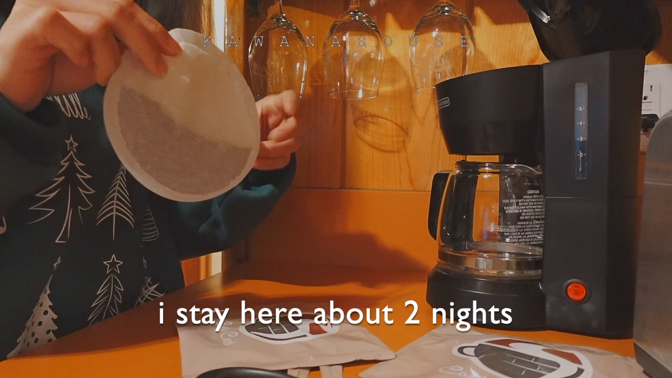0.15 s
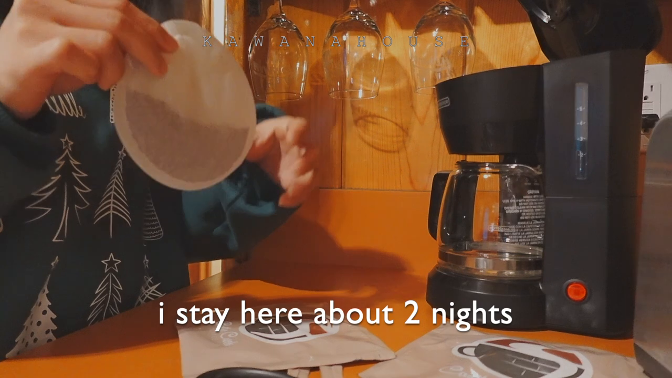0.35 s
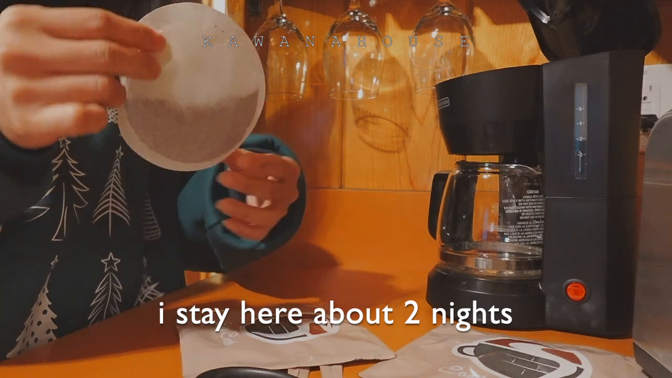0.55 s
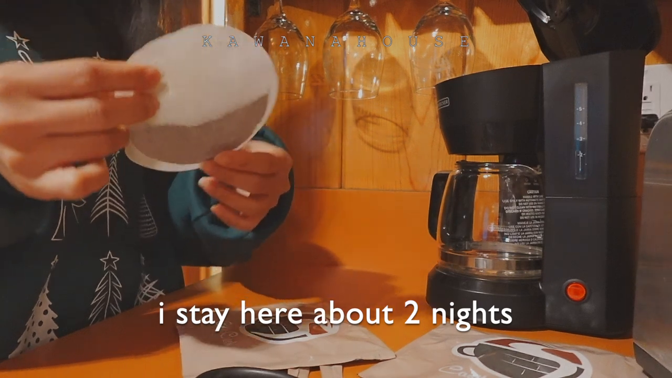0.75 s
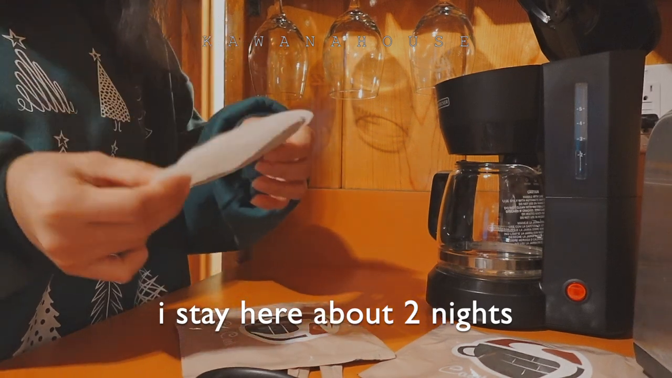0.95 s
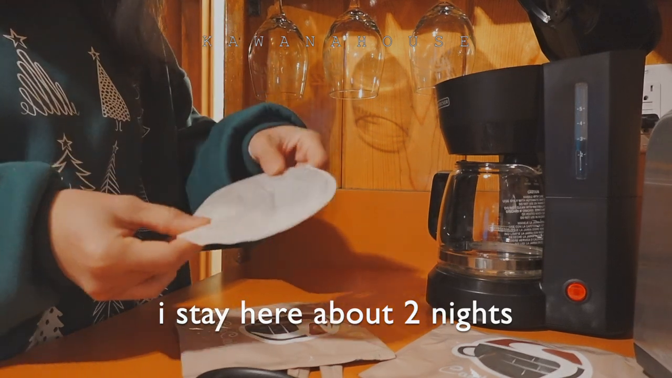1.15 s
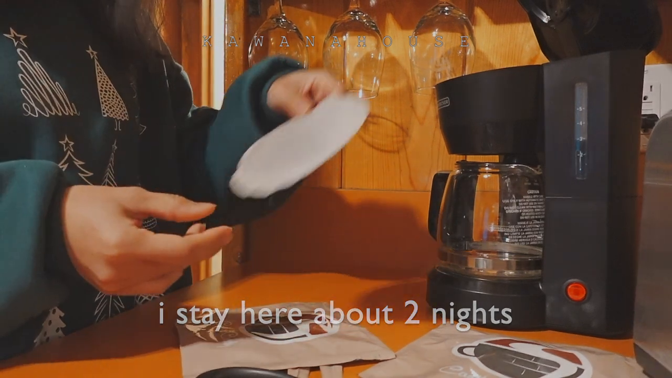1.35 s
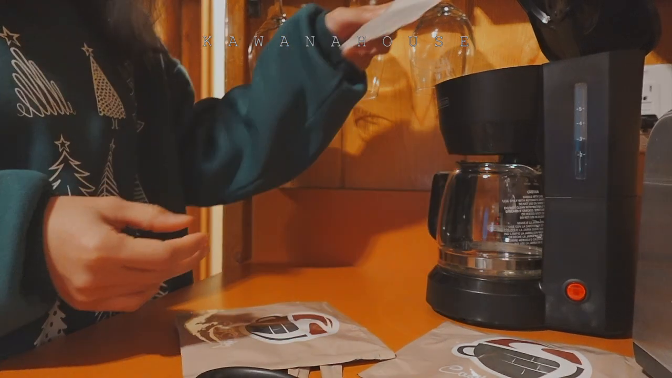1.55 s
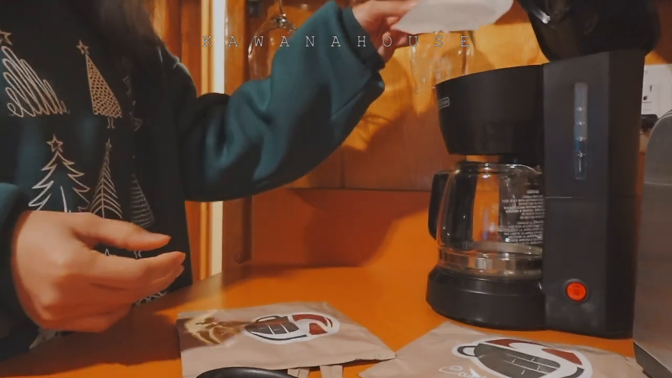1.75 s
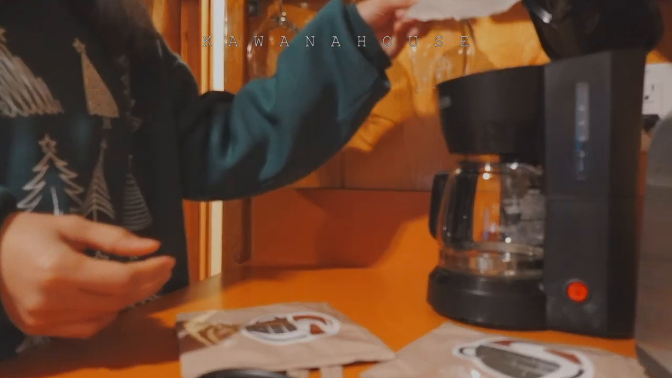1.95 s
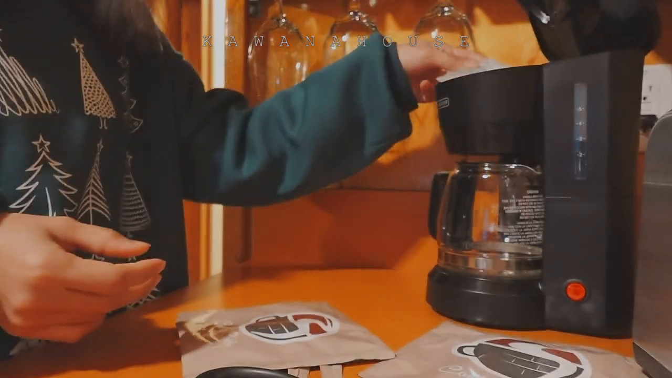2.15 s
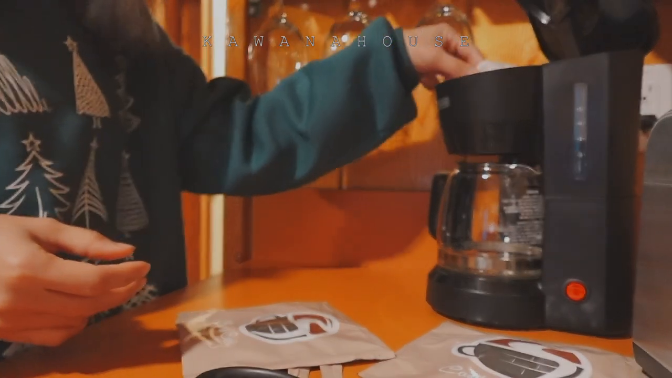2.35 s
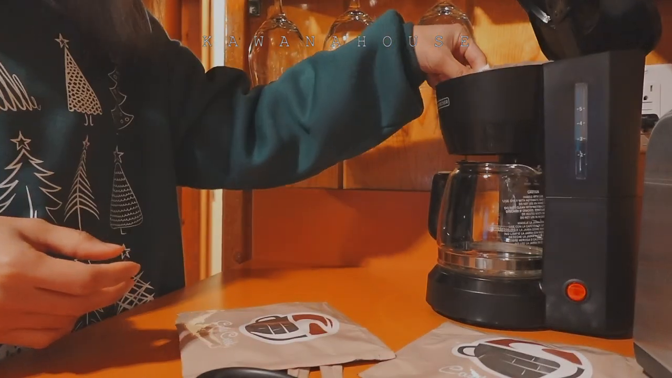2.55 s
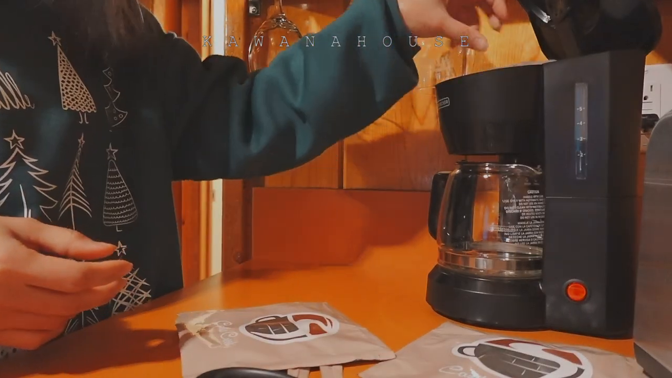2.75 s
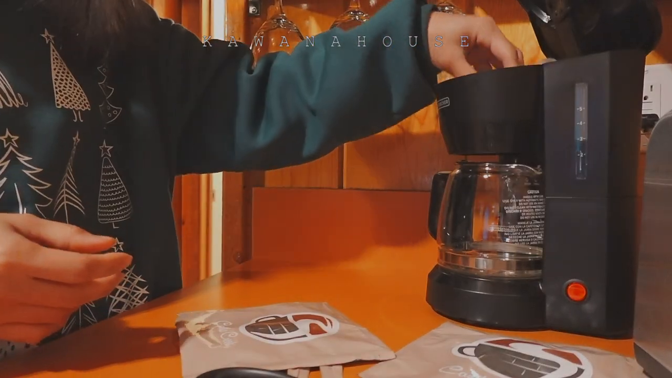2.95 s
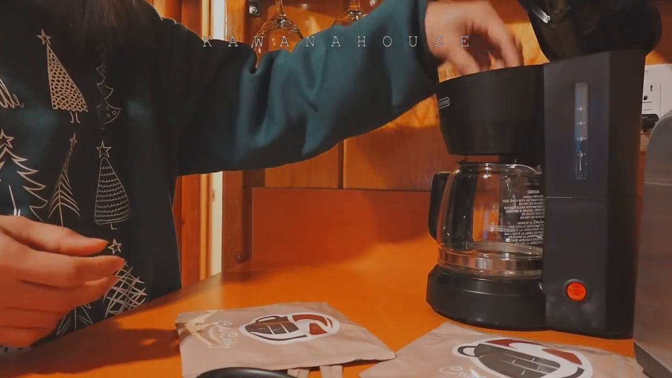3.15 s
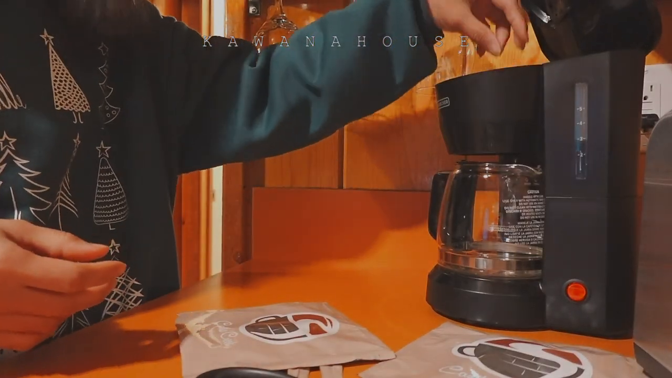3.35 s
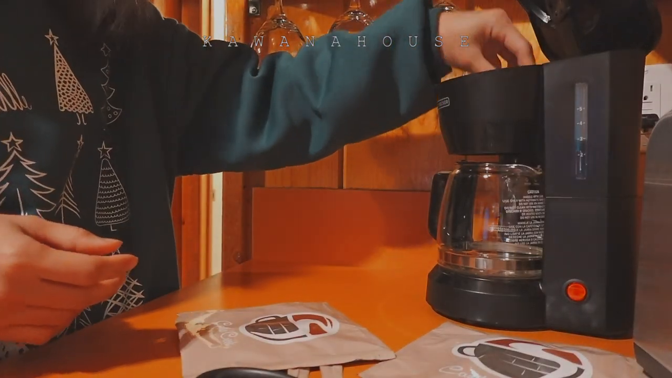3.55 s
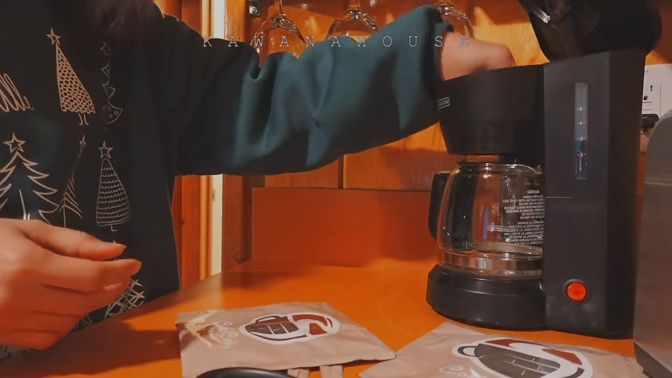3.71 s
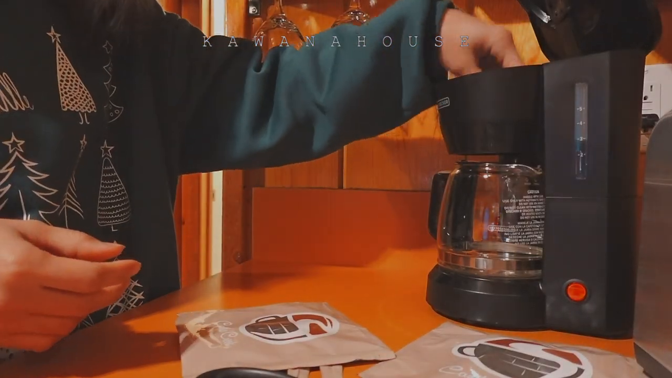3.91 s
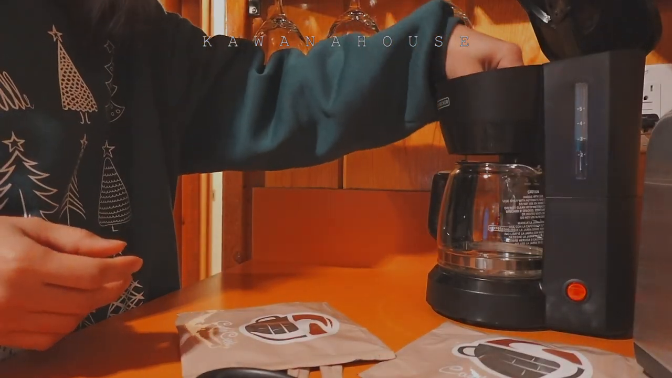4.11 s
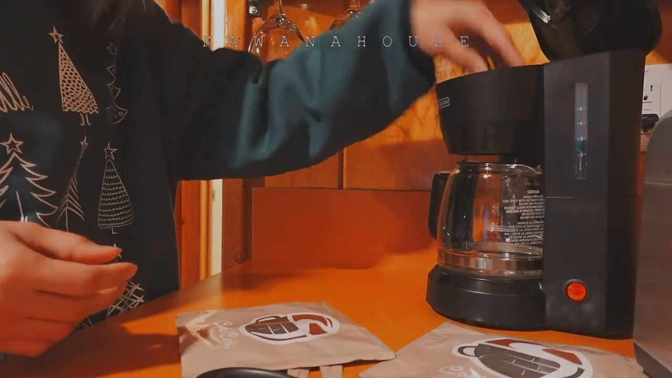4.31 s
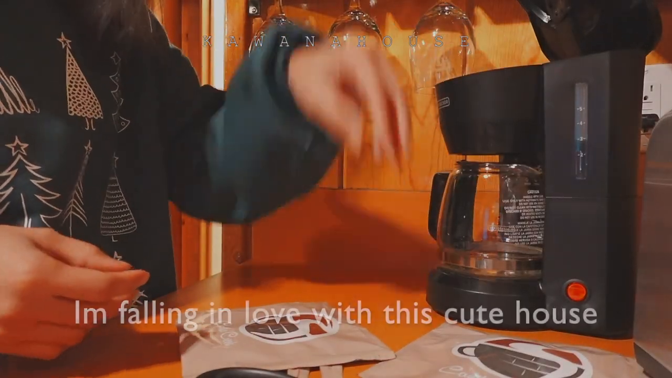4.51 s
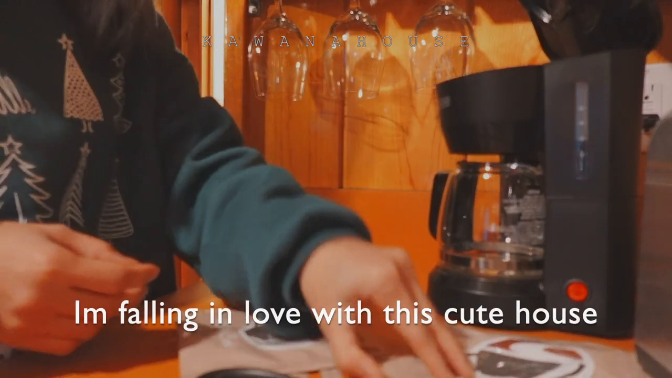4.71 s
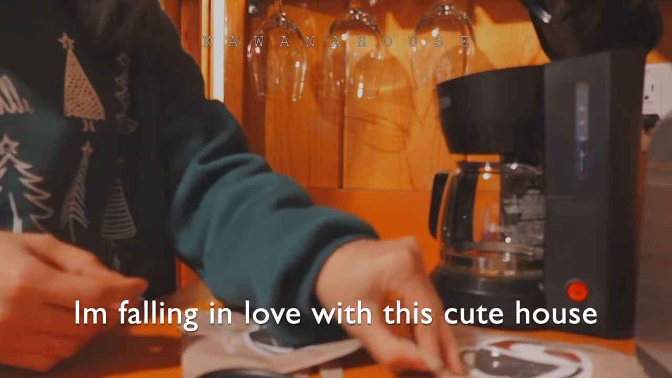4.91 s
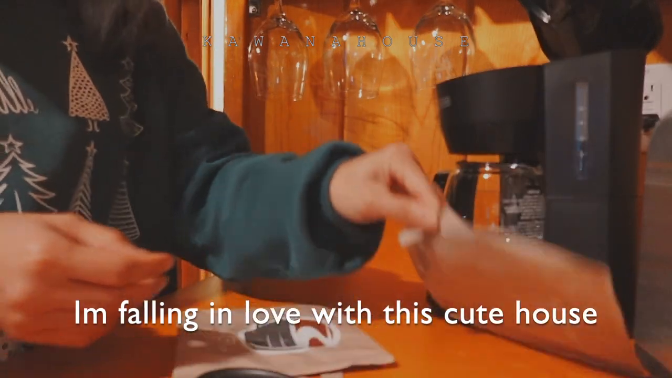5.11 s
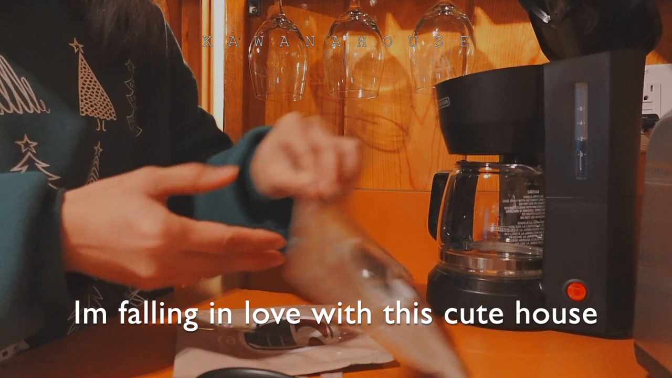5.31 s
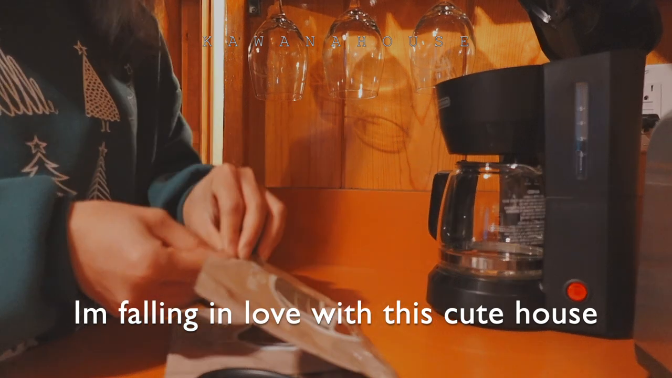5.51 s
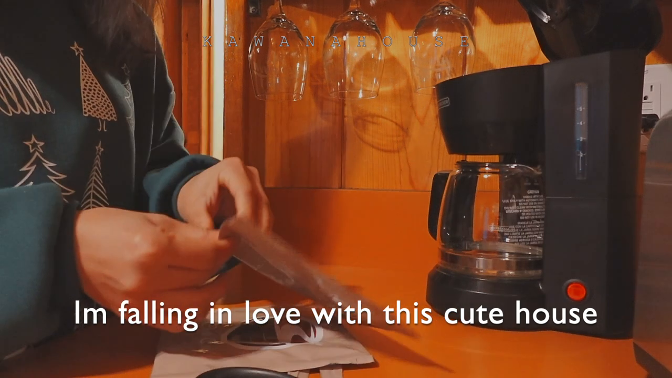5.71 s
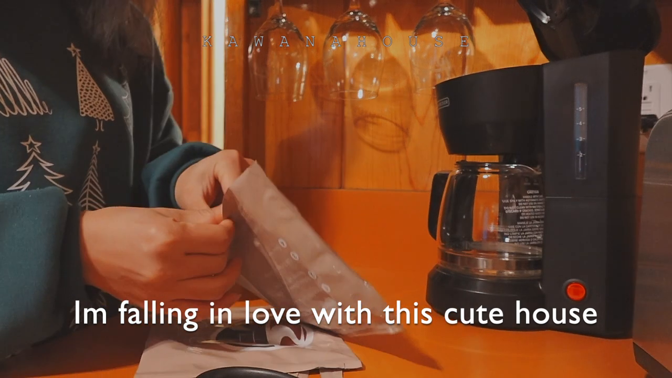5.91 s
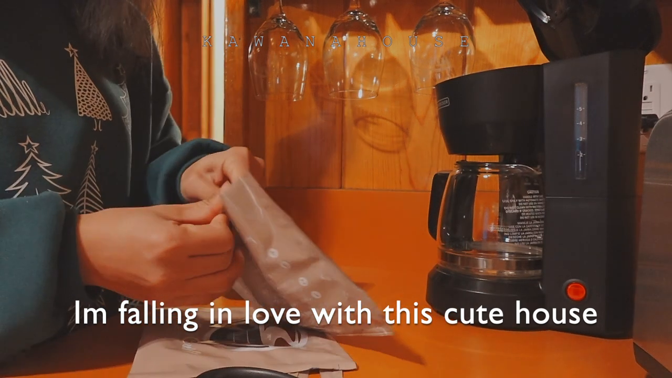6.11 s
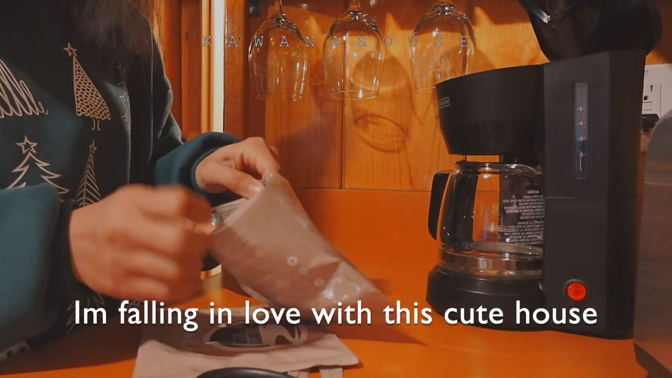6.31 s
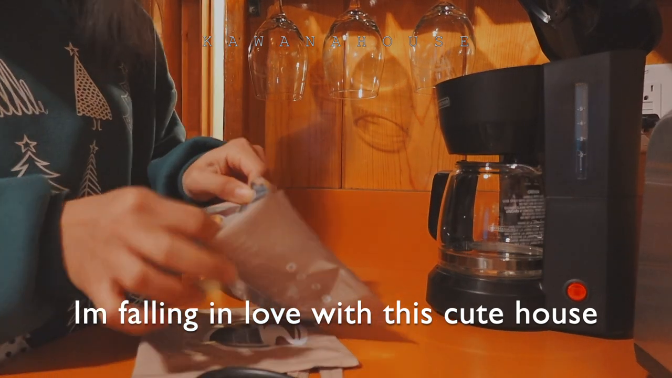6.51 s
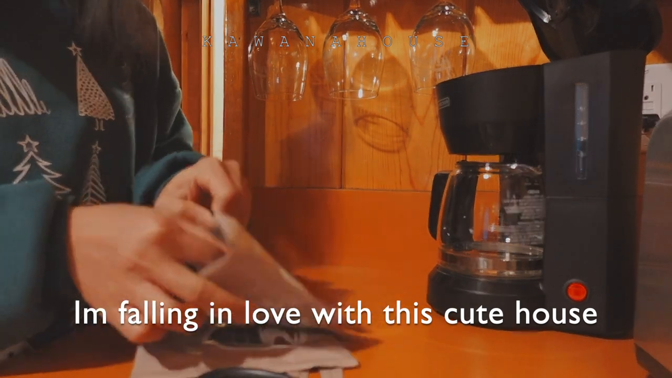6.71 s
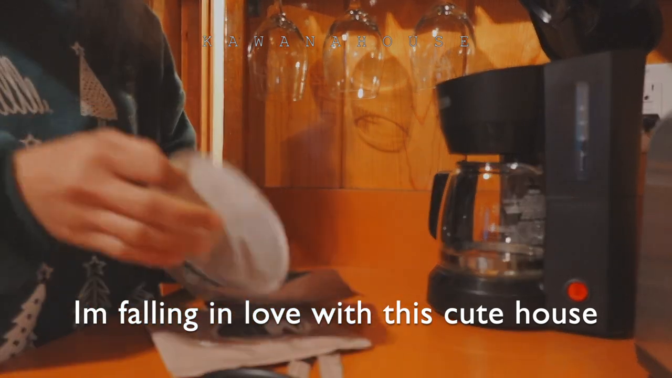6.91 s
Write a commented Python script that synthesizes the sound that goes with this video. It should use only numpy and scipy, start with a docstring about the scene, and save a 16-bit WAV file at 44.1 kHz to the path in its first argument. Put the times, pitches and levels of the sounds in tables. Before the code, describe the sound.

Soft dry rustles of a thin paper filter, scrapes and knocks in a plastic basket, then loud dense crackling of a stiff paper bag, close-miked.

```python
"""Small quiet kitchen, close two-channel microphone: a paper coffee filter is fingered, then pressed
into the plastic basket of a coffee maker. A hand lands on the counter, slides a stiff paper bag off
it and works at its top edge. Rubbed paper is grainy noise in a changing colour, creases are cracks
with a ringing panel, the basket and a thing on the counter are dying sines, hand blows are dull
noise. Sparse reflections and a steady hush place it all in the room."""
import sys
import numpy as np
from scipy import signal
from scipy.fft import rfft, irfft
from scipy.io import wavfile
from scipy.ndimage import uniform_filter1d

SR = 44100
rng = np.random.default_rng(int(sys.argv[2]) if len(sys.argv) > 2 else 0)


def to_wav(sig):
    """Store sig (one row per channel, or 1-D mono) as 16-bit WAV at the path in sys.argv[1].

    Samples outside -1..1 are clipped; the rate is SR.
    """
    pcm = np.clip(np.atleast_2d(sig), -1, 1) * 32767
    pcm = np.round(pcm).astype(np.int16)
    wavfile.write(sys.argv[1], SR, pcm.T)  # frames by channels


N = 306936  # samples

# Hush of the kitchen, relative spectrum: [f/Hz, level/dB per Hz]
HUSH_COLOUR = [(15, -78), (25, -45), (97, -2.5), (242, 1), (277, -0.5), (416, -8.5), (451, -5.5),
               (1130, -7.5), (1890, -8.5), (2350, -8), (3080, -11), (3520, -10.5), (5880, -15), (7510, -17),
               (16000, -18)]
HUSH_DB = -61

# Loudest creases that buckle: [t/s, level/dB, relative body/dB, relative air/dB]
SNAPS = [(0.1116, -60, -5, -10), (0.1748, -53, -4, -3), (0.2419, -50.5, -8, -11), (0.5929, -45, -1.5, -14),
         (0.6989, -46.5, 0.5, -2), (0.807, -34, -15, -9.5), (0.9751, -43.5, -2.5, -7),
         (1.1023, -45, -8, -11), (1.2866, -42, -6, -1), (1.6114, -52.5, -4, -4), (1.7646, -43, -6.5, -1),
         (2.3531, -40, 6, -9), (2.5196, -32.5, -10, 2), (3.1398, -39.5, -2, -5), (3.7131, -31.5, -10, -6),
         (4.0097, -39.5, -2, -4), (4.2012, -47, -16, -5), (4.7522, -26, -20, -19), (4.7943, -27, -20, -4),
         (4.8318, -22, -13, 0), (4.8462, -21, -6, 0), (5.0773, -22.5, -16, -24), (5.0931, -26.5, -8, -26),
         (5.1136, -35, -6, -24), (5.1456, -32.5, -8.5, -28), (5.218, -38.5, -1, -12),
         (5.4866, -28.5, -17, 1), (5.4959, -25, -15, 4), (5.5805, -31.5, -15, -1.5),
         (5.6222, -27.5, -19, -14), (5.6592, -28.5, -8, -6), (5.7241, -23, -9, 8), (5.77, -19.5, -12, -2),
         (5.7954, -18.5, -11, -11), (5.8432, -19.5, -4.5, -6.5), (5.9029, -25.5, -25, -1),
         (5.9186, -24.5, -3.5, -12), (5.9595, -20, -11, 2), (6.0122, -20.5, -9, -6), (6.0369, -19, -3, -3),
         (6.0629, -21, -3, 0), (6.1106, -27, -8, -8), (6.1293, -19, -11, 1), (6.1423, -22, -11, -4),
         (6.1516, -20.5, -3.5, -10), (6.1595, -16.5, -22, -15), (6.1734, -17, -13, -6.5),
         (6.1882, -16, -8.5, -8), (6.2092, -20.5, -6, 1), (6.2334, -17.5, -7, -5.5),
         (6.2371, -18.5, -9, -5), (6.2484, -24, -1, -8), (6.2647, -15.5, -7, -8), (6.2937, -19, -12, -4),
         (6.3069, -24.5, -3, -5), (6.3787, -19, -0.5, -2), (6.4993, -21, -11.5, -9),
         (6.5919, -20, -9.5, -12), (6.6269, -26, -2.5, -12), (6.6791, -24, -6.5, -8.5),
         (6.7221, -17.5, -0.5, -10)]
# Their relative spectrum: [f/Hz, level/dB per Hz]
SNAP_COLOUR = [(40, -64), (130, -29.5), (260, -8.5), (400, -22), (600, -15.5), (850, 1.5), (1400, -1),
               (2300, -1.5), (3600, 1), (5500, -2.5), (8000, -9), (11000, -13), (16000, -19)]
SNAP_FALL_MS = 11.5  # a panel's ring falls 20 dB in this time

# Hand strokes on the filter in the fingers, on the filter at the basket, and on the bag:
# [start t/s, length/s, relative level/dB, swell over the stroke/dB, brightness/dB per octave]
FILTER_STROKES = [(0.495, 0.096, -54.5, -9, -3.5), (0.578, 0.04, -44, -2, -2.2),
                  (0.62, 0.2, -48.5, -4, -1.5), (0.795, 0.21, -45.5, -6, -0.5), (1.0, 0.19, -52.5, 12, -1),
                  (1.175, 0.13, -44.5, -1, -0.2), (1.315, 0.15, -41, 8, 1), (1.465, 0.12, -51, -21, 2),
                  (1.745, 0.11, -53, -6, -1.5)]
BASKET_STROKES = [(2.07, 0.066, -53.5, 7, 1), (2.153, 0.044, -27.5, 0, 0), (2.21, 0.19, -41, 0, -0.1),
                  (2.325, 0.033, -34, -0.5, 0.3), (2.412, 0.12, -33, 9, -0.1),
                  (2.55, 0.18, -42.5, -11, -1.1), (2.91, 0.19, -36, -3, -0.3),
                  (3.508, 0.13, -38.5, 3, -0.5), (3.638, 0.14, -32, -3.5, 0), (3.8, 0.15, -44.5, -6, 1.5),
                  (4.062, 0.1, -40, 9, 2.5), (4.19, 0.14, -49.5, 8, 3)]
BAG_STROKES = [(4.742, 0.045, -27, 0.5, -0.8), (4.8, 0.052, -34.5, 8, -0.5), (4.87, 0.085, -47, 1, 4.5),
               (4.965, 0.13, -39.5, -3.5, 1.7), (5.08, 0.11, -39.5, -3, -2.5), (5.23, 0.18, -50.5, 2.5, 5),
               (5.403, 0.061, -43, -4, 0.2), (5.468, 0.032, -34.5, 7, 1), (5.51, 0.06, -50, -5, -1),
               (5.58, 0.355, -37, -1, 0.6), (5.962, 0.097, -30.5, -4.5, -0.5), (6.095, 0.22, -30, 3, -1.5),
               (6.335, 0.029, -29.5, 2, -4), (6.41, 0.18, -44, 9, 1), (6.466, 0.023, -36, 3, -3.5),
               (6.592, 0.028, -28.5, 3, -1.6), (6.682, 0.29, -33, 1, -0.5), (6.85, 0.16, -19.5, 7, 1.6)]
# A stroke grips quickly and dies away when the fingers let go
GRIP_S, RELEASE_DB_PER_S = 0.0093, 658

# Relative spectra of each rub: [f/Hz, level/dB per Hz]
PINCH_COLOUR = [(180, -41), (300, -15.5), (519, -14), (978, -8), (1080, -14), (1360, 0), (1510, -4.5),
                (2000, -2), (3290, -3.5), (13800, -17.5), (16000, -24)]  # filter pinched between the fingers
SLIDE_COLOUR = [(180, -56), (300, -29), (537, -12), (678, -14), (814, 4.5), (1120, -10), (1360, 0),
                (1560, -3.5), (2210, -5.5), (4910, -3.5), (15000, -14.5), (16000, -21)]  # filter drawn out through the fingers
RIM_COLOUR = [(59, -54), (100, -34), (255, -2), (415, -15), (502, -15), (608, 5.5), (691, 2.5), (1030, -6),
              (1580, -5), (2370, -4.5), (3120, -10), (3780, -8.5), (6990, -15.5), (15000, -21.5),
              (16000, -32)]  # filter at the basket rim
DEEP_COLOUR = [(60, -35), (120, -33), (270, -21.5), (400, -33.5), (530, -27), (620, -8.5), (790, -6.5),
               (900, 3.5), (1000, -4), (1200, -12), (1750, -13), (2300, -1.5), (3050, -14), (3700, -9),
               (6000, -11.5), (10000, -20), (16000, -26.5)]  # filter down in the hollow
BAG_COLOUR = [(59, -57), (100, -20), (249, -13.5), (415, -17), (691, -8.5), (872, -4), (1200, -4.5),
              (1720, -4.5), (1870, -1), (2170, -4), (2580, -1.5), (3700, -3), (5650, -6.5), (14700, -18.5),
              (16000, -30)]
# Change from pinching to sliding: [t/s, share 0-1]
SLIDING = [(1.0, 0), (1.2, 0.97)]
# How far the filter has gone into the basket: [t/s, depth 0-1]
DEPTH = [(2.5, 0.08), (3.0, 0.17), (3.5, 0.97)]

# Soft pushes of hand and bag on machine and counter: [t/s, relative level/dB, t60/s]
THUMPS = [(2.186, -42.5, 0.27), (2.47, -52, 0.56), (2.605, -47, 0.45), (2.921, -55, 0.34),
          (3.54, -49, 0.24), (3.86, -42.5, 0.36), (4.17, -53, 0.3), (4.748, -35.5, 0.12),
          (4.766, -28.5, 0.15), (4.825, -43, 0.51), (5.084, -48, 0.2), (6.225, -51, 0.3), (6.35, -44, 0.15),
          (6.72, -48, 0.25)]
# Their relative spectrum: [f/Hz, level/dB per Hz]
THUMP_COLOUR = [(25, -35), (50, -19), (80, 2.5), (125, 4.5), (170, 0.5), (260, 4.5), (370, -8.5),
                (500, -15), (700, -20), (2000, -60), (8000, -86)]
THUMP_RISE_S = 0.0091
LANDING_S = 4.768  # the hand lands on the counter
# Ring of something on the counter as the hand lands: [f/Hz, relative level/dB, t60/s]
COUNTER_MODES = [(198, -45, .6), (258, -31, 0.2), (447, -49, 1.15), (491, -30, 0.17), (556, -47, 0.44)]

# Fingers knock the basket: [t/s, relative level/dB]
KNOCKS = [(2.599, -19), (3.852, -17.5), (4.009, -36)]
# Hollow modes of the basket: [f/Hz, relative level/dB, t60/s]
BASKET_MODES = [(260, -11, 0.14), (300, -12, 0.17), (597, 3.5, 0.025), (777, 0.5, 0.073), (932, 7.5, 0.029),
                (1044, 1.5, 0.039), (1360, -3.5, 0.046), (1890, 4.5, 0.026), (2040, 0, 0.029),
                (2770, 1, 0.023)]
# How well the thin basket wall radiates a knock: [f/Hz, level/dB]
BASKET_WALL = [(100, -11), (270, 3), (430, -15), (750, -0.5), (3000, 0.5)]

# Decay of the kitchen's reflections: [f/Hz, t60/s]
ROOM_T60 = [(150, 0.55), (600, 0.37), (1500, 0.47), (4000, 0.28), (9000, 0.21), (16000, 0.24)]
# Lean of the stereo picture: [f/Hz, left minus right level/dB]
LEAN = [(100, 0.5), (700, -1.5), (1300, -1.5), (2400, -2.5), (4400, -4), (8000, -2.2), (14000, 0.7)]
# Side signal of scattered sound, relative to the middle: [f/Hz, level/dB]
WIDTH = [(60, -27), (200, -21), (500, -21.5), (1200, -20), (2500, -18), (5000, -13.5), (9000, -9.5),
         (13000, -17.5), (16000, -40)]
# Side share of sound from all round: [f/Hz, level/dB]
DIFFUSE = [(60, -13), (250, -7.5), (800, -7), (2500, -8.5), (6000, -10), (10000, -13), (16000, -22)]
EDGE_HZ = 16150  # upper limit of the microphone


def amp(db):
    """Decibels to gain."""
    return 10 ** (np.asarray(db) / 20)


def unit(x):
    """Scales to rms 1."""
    return x / np.sqrt(np.mean(x ** 2) + 1e-20)


def read(points, hz):
    """Reads a table along log frequency."""
    f, value = np.transpose(points)
    return np.interp(np.log(hz + 1), np.log(f + 1), value)


def add(mix, s, sound):
    """Mixes a sound in at time s."""
    part = mix[round(s * SR):][:len(sound)]
    part += sound[:len(part)]


def bins(size):
    """Frequencies of a spectrum of this many samples."""
    return np.fft.rfftfreq(size, 1 / SR)


def colour(x, points):
    """Filters a sound by a table of levels over frequency."""
    return irfft(rfft(x) * amp(read(points, bins(len(x)))), len(x))


def causal(x, gain_db):
    """Filters a short sound at minimum phase, so that all ringing follows the attack."""
    log_gain = np.log(amp(np.r_[gain_db, gain_db[-2:0:-1]]))
    response = np.exp(np.conj(signal.hilbert(log_gain)))[:len(gain_db)]
    return irfft(rfft(x) * response)


def ring(modes, size):
    """A struck object sounds as sines at random phases, each dying at its own rate."""
    t = np.arange(size) / SR
    out = np.zeros(size)
    for hz, db, t60 in modes:
        out += amp(db - 60 * t / t60) * np.sin(2 * np.pi * (hz * t + rng.random()))
    return out


def hush():
    """The quiet room's steady background is coloured noise."""
    return amp(HUSH_DB) * unit(colour(rng.standard_normal(N), HUSH_COLOUR))


def creases(rows, spectrum, fall_ms, crack, crack_ms, dull, panel_db, body_db, air_db, size=2048):
    """A crease flips with a bright crack; the panel around it rings, duller, with its own resonances."""
    out = np.zeros(N)
    ms = np.arange(size) / SR * 1000
    hz = bins(size)
    paper_db = read(spectrum, hz)
    pole = np.clip(dull, 0, .8)
    panel_grid = np.linspace(np.log(300), np.log(16000), 56)
    # shares of each frequency that belong to body and air
    low = read([(1300, 0.99), (2300, 0)], hz)
    high = read([(5000, 0.068), (7500, 0.93)], hz)
    for s, db, body, air in rows:
        flip, flutter = rng.standard_normal((2, size))
        ringing = signal.lfilter([1 - pole], [1, -pole], flutter) * 10 ** (-ms / max(fall_ms, 4))
        resonances = rng.standard_normal(len(panel_grid)).clip(-2, 2)
        panel = np.interp(np.log(hz + 1), panel_grid, resonances)
        tone_db = paper_db + low * (body + body_db) + high * (air + air_db) + panel_db * panel
        snap = causal(crack * flip * np.exp(-ms / crack_ms) + ringing, tone_db)
        # the level is set by the 1.8-6 kHz band over the first 8 ms
        middle = irfft(rfft(snap) * (abs(hz - 3900) < 2100))[:350]
        add(out, s, snap * amp(db) / np.sqrt(np.mean(middle ** 2)))
    return out


def effort(strokes, waver_db):
    """Each stroke grips, swells or eases and lets go as pressure wavers: [t/s, level/dB, brightness]."""
    start, length, db, swell_db, bright = np.transpose(strokes)[:, :, None]
    s = np.arange(start.min(), (start + length).max() + .15, .001)
    held_db = db + swell_db * (np.clip((s - start) / length, 0, 1) - .5)
    release_db = RELEASE_DB_PER_S * np.maximum(s - start - length, 0)
    grip = np.clip((s - start) / GRIP_S, 0, 1)
    power = (grip * amp(held_db - release_db)) ** 2 + 1e-14
    total = power.sum(0)
    waver = unit(uniform_filter1d(rng.standard_normal(len(s)), size=16))
    level_db = 10 * np.log10(total) + waver_db * waver
    return np.column_stack([s, level_db, (bright * power).sum(0) / total])


def rub(rows, spectrum, grains_per_s, spread_db, hiss, patchy_db, later, blend):
    """Fibres catch and slip: tiny puffs over a hiss, coloured by a sheet that keeps changing shape."""
    s, level_db, bright = np.transpose(rows)
    puff_size = amp(spread_db * np.minimum(rng.exponential(1, N), 4))
    puff_size = puff_size * (rng.random(N) < grains_per_s / SR)
    grain = np.exp(-np.arange(400) / SR / 0.0019)
    power = signal.oaconvolve(puff_size ** 2, grain)[:N].clip(0)
    drive = rng.standard_normal(N) * np.sqrt(power / power.mean() + hiss ** 2)

    hz, t, z = signal.stft(drive, SR, nperseg=768)
    patches = uniform_filter1d(rng.standard_normal(z.shape), size=4, axis=0)
    patches = unit(uniform_filter1d(patches, size=4, axis=1))
    octaves = np.log2(np.clip(hz, 600, 12000) / 3000)[:, None]
    field_db = read(spectrum, hz)[:, None] + octaves * np.interp(t, s, bright) + patchy_db * patches
    if later is not None:  # as the grip or the place changes, other resonances take over
        share = np.interp(t, *np.transpose(blend)).clip(0, 1)
        field_db += np.outer(read(later, hz) - read(spectrum, hz), share)
    sound = signal.istft(z * amp(field_db), SR, nperseg=768)[1][:N]

    # evened out over 50 ms, then shaped by the hand
    sound /= np.sqrt(uniform_filter1d(sound ** 2, size=2200) + 1e-20)
    return sound * amp(np.interp(np.arange(N) / SR, s, level_db, left=-120, right=-120))


def crinkle(rub_rows, spectrum, per_s, below_db, spread_db, most_db, fall_ms):
    """Many small creases give way at random, harder as the paper is worked, up to a greatest level."""
    s, level_db, bright = np.transpose(rub_rows)
    gap, strength, body, air = rng.random((600, 4)).T
    at = s[0] - np.cumsum(np.log(1 - gap)) / per_s
    db = np.interp(at, s, level_db) + below_db - spread_db * np.log(np.maximum(strength, .06))
    db = np.minimum(db, most_db)
    slope = np.interp(at, s, bright)
    rows = np.column_stack([at, db, 10 * (body - .5) - slope, 10 * (air - .5) + slope])
    return creases(rows[at < s[-1]], spectrum, fall_ms, crack=0.68, crack_ms=0.92, dull=0.22,
                   panel_db=5, body_db=-0.5, air_db=0.5)


def thumps(level_db, ring_db):
    """Dull blows of the hand are dying noise; its landing sets a thing on the counter ringing."""
    out = np.zeros(N)
    t = np.arange(SR) / SR
    for s, db, t60 in THUMPS:
        fall = amp(-60 * np.maximum(t - THUMP_RISE_S, 0) / t60)
        swell = np.minimum(t / THUMP_RISE_S, 1) * fall
        blow = colour(rng.standard_normal(SR), THUMP_COLOUR) * swell
        add(out, s, amp(db + level_db) * blow * np.linalg.norm(swell) / np.linalg.norm(blow))
    ring_rise = np.minimum(np.arange(2 * SR) / SR / 0.0044, 1)
    add(out, LANDING_S, amp(ring_db) * ring(COUNTER_MODES, size=2 * SR) * ring_rise)
    return out


def knocks(level_db, tick_db, tick_s):
    """A fingernail ticks on the plastic basket, which answers with short hollow modes."""
    out = np.zeros(N)
    t = np.arange(8000) / SR
    for s, db in KNOCKS:
        tick = unit(uniform_filter1d(rng.standard_normal(len(t)), size=9)) * np.exp(-t / tick_s)
        add(out, s, amp(db + level_db) * (ring(BASKET_MODES, size=len(t)) + amp(tick_db) * tick))
    return out


def kitchen(x, wet_db):
    """Sparse reflections of random sign, dying at a rate that depends on frequency."""
    after_gap = np.arange(SR) > .005 * SR
    taps = rng.choice([-1., 1.], SR) * (rng.random(SR) < 4000 / SR) * after_gap
    hz, t, z = signal.stft(taps, SR, nperseg=256)
    decay = amp(-60 * t / read(ROOM_T60, hz)[:, None])
    tail = signal.istft(z * decay, SR, nperseg=256)[1]
    return amp(wet_db) * signal.fftconvolve(x, tail / np.linalg.norm(tail))[:N]


def spread(x, ambience):
    """Scatter off counter and room reaches both microphone ports at unrelated phases; most bands lean right."""
    z = signal.stft(x, SR, nperseg=256)[2]
    random_phase = np.exp(2j * np.pi * rng.random(z.shape))
    scatter = signal.istft(z * random_phase, SR, nperseg=256)[1][:N]
    side = colour(unit(scatter) * x.std(), WIDTH) + colour(ambience, DIFFUSE)
    lean_db = read(LEAN, bins(N)) * np.array([[.5], [-.5]])
    return irfft(rfft(np.array([x + side, x - side])) * amp(lean_db), N)


def scene():
    """The filter, the basket and the bag in turn, over the hush of the room."""
    on_filter = effort(FILTER_STROKES, waver_db=1.2)
    on_basket = effort(BASKET_STROKES, waver_db=1.0)
    on_bag = effort(BAG_STROKES, waver_db=1.12)

    coffee_filter = amp(-2.5) * rub(on_filter, PINCH_COLOUR, grains_per_s=520, spread_db=2.5, hiss=1.0,
                                    patchy_db=2.5, later=SLIDE_COLOUR, blend=SLIDING)
    coffee_filter += crinkle(on_filter, PINCH_COLOUR, per_s=60, below_db=-9, spread_db=3.5,
                             most_db=-49.0, fall_ms=7.9)
    basket = amp(-2.0) * rub(on_basket, RIM_COLOUR, grains_per_s=900, spread_db=3.5, hiss=0.78,
                             patchy_db=2.5, later=DEEP_COLOUR, blend=DEPTH)
    basket += crinkle(on_basket, DEEP_COLOUR, per_s=80, below_db=-12.0, spread_db=3.0,
                      most_db=-38, fall_ms=9.1)
    bag = amp(-3) * rub(on_bag, BAG_COLOUR, grains_per_s=600, spread_db=0.5, hiss=1.0,
                        patchy_db=2.0, later=None, blend=None)
    bag += crinkle(on_bag, BAG_COLOUR, per_s=110, below_db=-8, spread_db=4.0,
                   most_db=-26.5, fall_ms=7)

    snaps = creases(SNAPS, SNAP_COLOUR, SNAP_FALL_MS, crack=1.27, crack_ms=1.43, dull=0.28,
                    panel_db=4, body_db=4.5, air_db=7)
    taps = colour(knocks(level_db=-10, tick_db=4, tick_s=0.0018), BASKET_WALL)
    blows = thumps(level_db=-2.5, ring_db=3.5)
    close = coffee_filter + basket + bag + snaps + taps + blows

    ambience = kitchen(close, wet_db=-17.5) + amp(2.5) * hush()
    return spread(close + kitchen(close, wet_db=-15.0) + hush(), ambience)


def record(dry):
    """Peaks are rounded off; the microphone drops the deepest bass and the highest treble."""
    ceiling = .9
    rounded = ceiling * np.tanh(dry / ceiling)
    bass_cut = signal.butter(4, 46, "highpass", fs=SR, output="sos")
    thinned = signal.sosfilt(bass_cut, rounded)
    treble_cut = signal.firwin(255, EDGE_HZ, window=("kaiser", 8), fs=SR)
    return signal.oaconvolve(thinned, treble_cut[None], "same")


dry = scene()
out = record(dry)
to_wav(out)
```